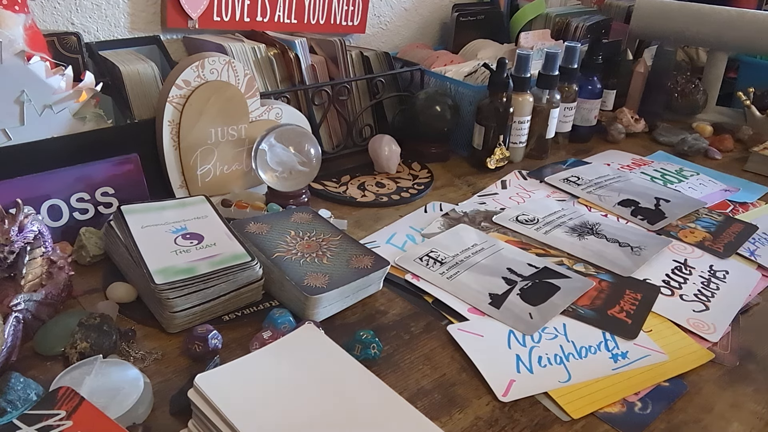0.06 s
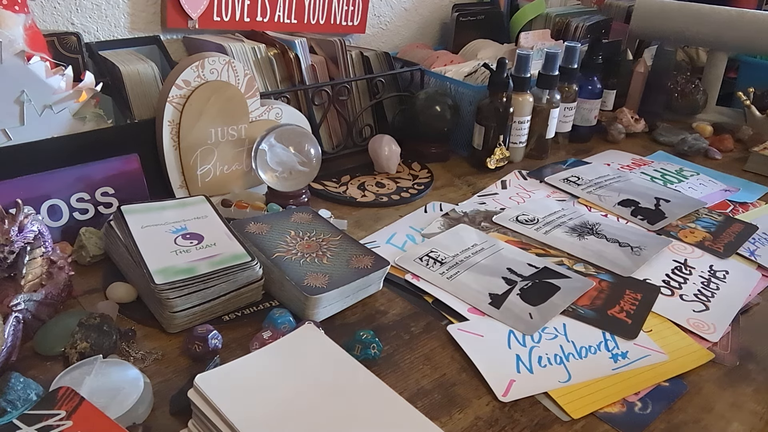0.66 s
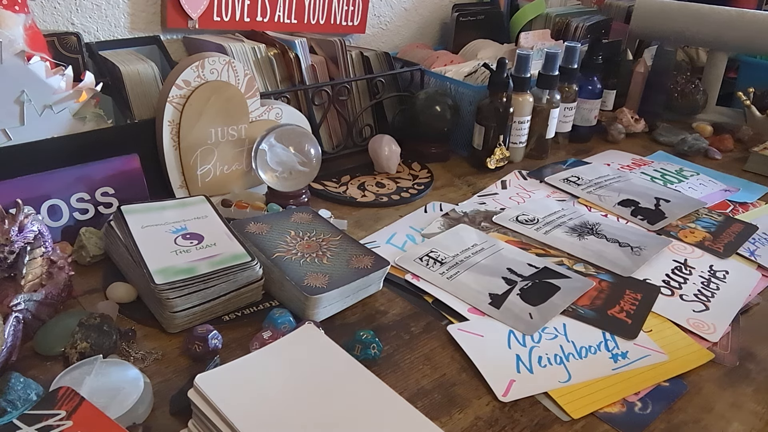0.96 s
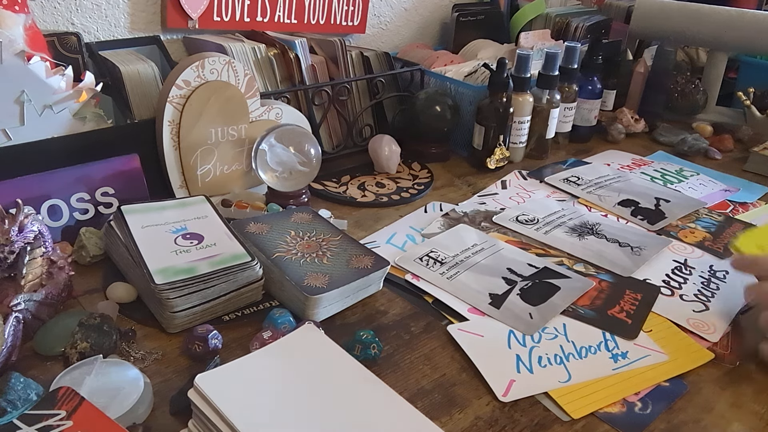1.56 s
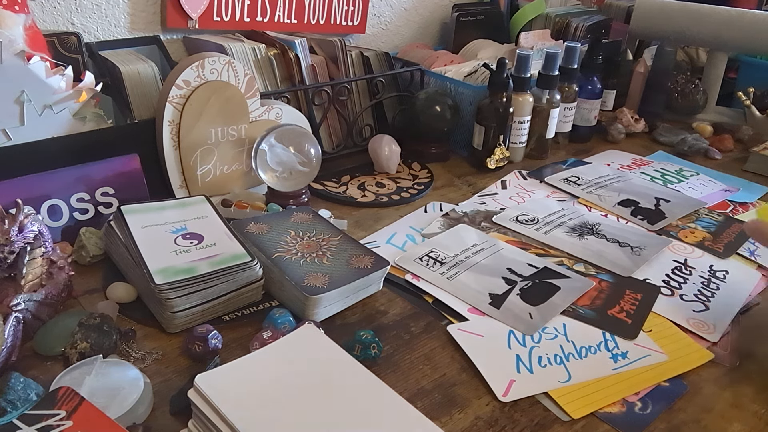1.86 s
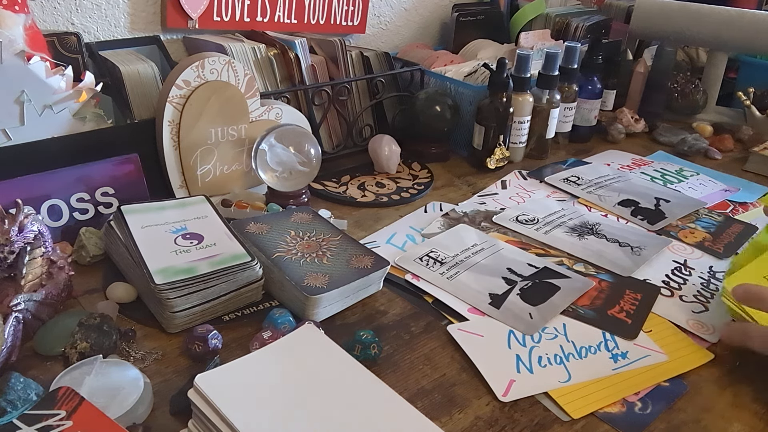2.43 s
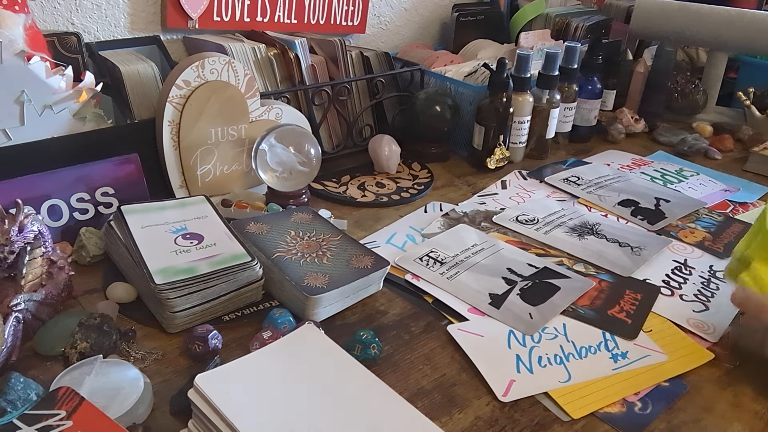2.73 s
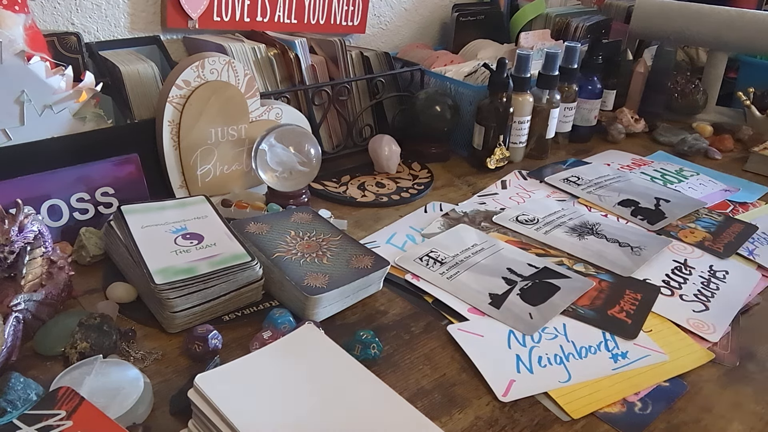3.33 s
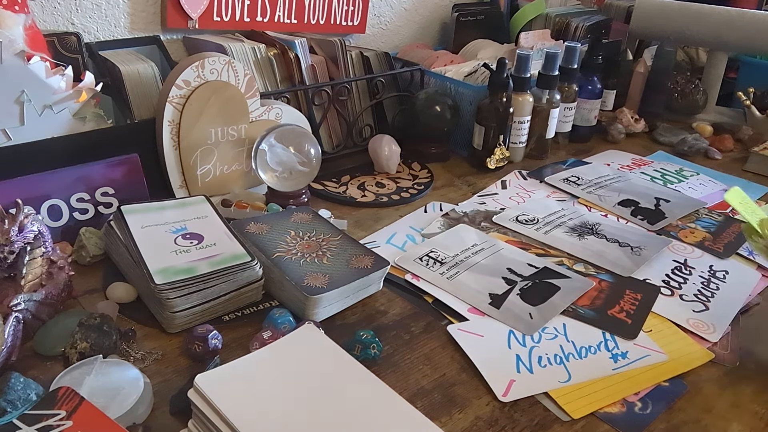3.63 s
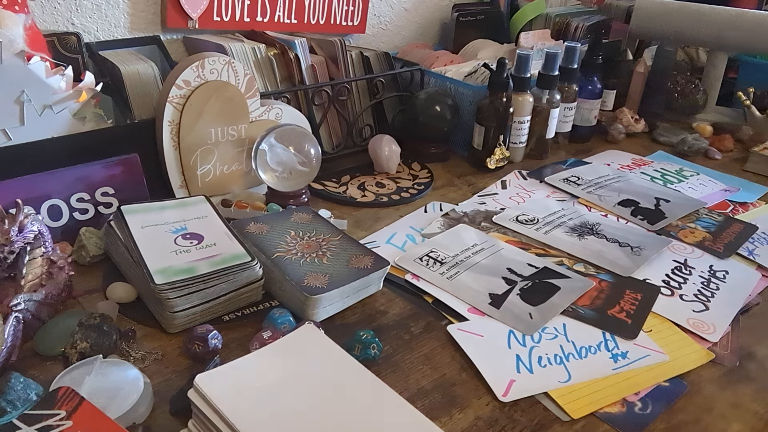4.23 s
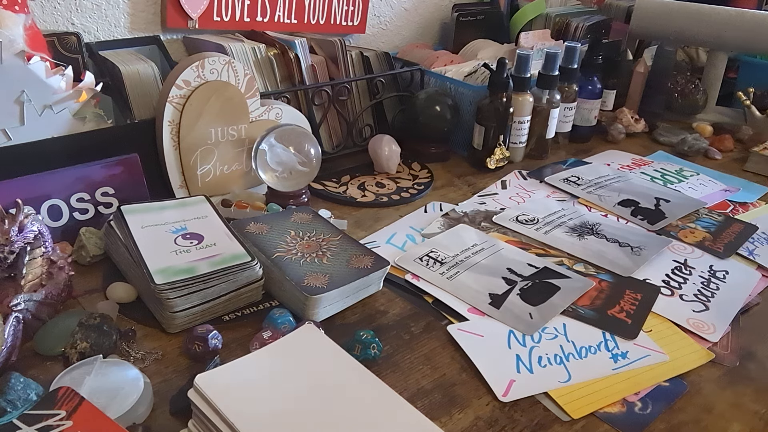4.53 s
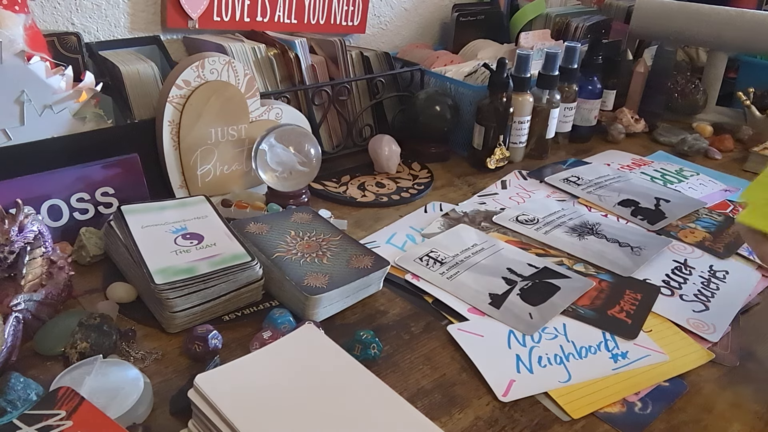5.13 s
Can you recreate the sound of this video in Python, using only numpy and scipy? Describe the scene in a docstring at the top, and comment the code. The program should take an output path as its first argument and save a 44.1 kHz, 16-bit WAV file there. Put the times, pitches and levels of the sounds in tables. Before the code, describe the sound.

Paper cards are handled close to the microphone in a small, quiet room. They slide over each other with soft hisses and rubs, their edges clicking, and small packets flop together. The deck is then knocked twice on a wooden table, two thuds with a brief clatter, much louder than the rest. A few faint slides and ticks follow over a low room rumble.

```python
"""Paper cards slide, tick and flop together close by, then the deck is knocked twice on a wooden table.
Card faces hiss and edges rub with the speed of each stroke; edges snap off each other and ring the card.
Small packets meet on a cushion of air. Each squaring knock is a thud, a clatter and the table's ring.
Underneath: hands shifting on the table and the low rumble of a small, quiet room."""
import sys
import numpy as np
from scipy import signal
from scipy.fft import rfft, irfft
from scipy.io import wavfile

SR = 44100
rng = np.random.default_rng(int(sys.argv[2]) if len(sys.argv) > 2 else 0)


def to_wav(sig):
    """Store sig (one row per channel, or 1-D mono) as 16-bit WAV at the path in sys.argv[1].

    Samples outside -1..1 are clipped; the rate is SR.
    """
    pcm = np.clip(np.atleast_2d(sig), -1, 1) * 32767
    pcm = np.round(pcm).astype(np.int16)
    wavfile.write(sys.argv[1], SR, pcm.T)  # frames by channels


N = 228737
T = np.arange(N) / SR
DECK_LATE_MS = -.19  # left-channel lag at the deck's usual position


def undb(db):
    """Decibels to gain."""
    return 10 ** (np.asarray(db) / 20)


def unit(x):
    """Scale to rms 1."""
    return x / np.sqrt(np.mean(x ** 2))


def add(track, start_s, sound):
    """Mix a sound into a track."""
    i = max(int(start_s * SR), 0)
    part = sound[..., :max(N - i, 0)]
    track[..., i:i + part.shape[-1]] += part


def colour(x, points):
    """Minimum-phase filter through (f/Hz, level/dB) points; keeps the power of white noise."""
    n = 2 * x.shape[-1]
    hz, db = np.transpose(points)
    log_hz = np.log(np.fft.rfftfreq(n, 1 / SR) + 1)
    gain = unit(undb(np.interp(log_hz, np.log(hz), db)))
    cepstrum = irfft(np.log(gain)) * (1 + np.sign(np.fft.fftfreq(n)))
    return irfft(rfft(x, n) * np.exp(rfft(cepstrum)))[..., :n // 2]


def resonance(x, hz, width_hz):
    """Resonator, gain 1 at its centre."""
    return signal.lfilter(*signal.iirpeak(hz, hz / min(width_hz, SR / 4), fs=SR), x)


def double_resonance(x, hz, width_hz):
    """Two equal resonators in series."""
    return resonance(resonance(x, hz, width_hz), hz, width_hz)


def lowpass(x, hz, order=2):
    """Maximally flat low-pass."""
    return signal.sosfilt(signal.butter(order, hz, fs=SR, output="sos"), x)


def highpass(x, hz):
    """First-order high-pass."""
    return signal.sosfilt(signal.butter(1, hz, "high", fs=SR, output="sos"), x)


def walk(rate_hz):
    """Random wander, spread near 1."""
    knots = rng.standard_normal(int(N / SR * rate_hz) + 2)
    return np.interp(T * rate_hz, np.arange(len(knots)), knots)


def grains(per_s, spread_db, size=N):
    """Tiny contacts at random times, most weak, a few strong."""
    strength = undb(spread_db * np.minimum(rng.exponential(size=size), 4))
    return unit((rng.random(size) < per_s / SR) * rng.choice([-1, 1], size) * strength)


def ears(x, late_ms):
    """Mono to stereo; the left lags by late_ms (negative: leads)."""
    lag = int(round(late_ms * SR / 1000))
    return np.array([np.pad(x, (max(k, 0), 0))[:len(x)] for k in (lag, -lag)])


def crackle(per_s, spread_db, shared_hz, late_ms=-0.13, size=N):
    """Contacts spread over a card: both sides share the lows, the highs are independent."""
    common, left, right = (grains(per_s, spread_db, size) for _ in range(3))
    lows = ears(lowpass(common, shared_hz, order=1), late_ms)
    return lows + highpass(np.array([left, right]), shared_hz)


def room(x, early_db, tail_db, t60_s=0.17, early_s=0.0062, shared_hz=600):
    """Add early scatter from things on the table and a short wall tail, near mono in the bass."""
    t = T[:SR // 2]
    early = np.exp(-t / early_s) * (t > .002) * rng.standard_normal((2, len(t)))
    tail = undb(-60 * t / t60_s) * np.clip(t / 0.014 - .5, 0, 1) * rng.standard_normal((2, len(t)))
    mid, side = (undb(early_db) * unit(early) + undb(tail_db) * unit(tail)) / np.sqrt(2 * len(t))
    side = highpass(side, shared_hz)
    spectrum = [(150, 1.5), (500, 2), (3500, -1.5), (7000, -1.5), (16000, -0.5)]  # f/Hz, level/dB
    response = colour(np.array([mid + side, mid - side]), spectrum)
    return x + signal.fftconvolve(x, response, axes=1)[:, :N]


def room_tone():
    """Wavering low rumble common to both sides, under a faint wide hiss and a thin whine."""
    # still-room spectrum: f/Hz, level/dB
    spectrum = [(20, -30.5), (45, -13), (65, 2), (95, 0.5), (130, -10), (190, -16), (300, -24),
                (600, -36.5), (1400, -31.5), (3000, -40.5), (6000, -49), (16000, -56)]
    mid, side = colour(rng.standard_normal((2, N)), spectrum)
    side = highpass(side, 700) + undb(-14.5) * side
    rumble = undb(-66.5) * unit(double_resonance(rng.standard_normal(N), hz=68, width_hz=30))
    whine = undb(-87) * unit(double_resonance(rng.standard_normal(N), hz=970, width_hz=60))
    air = undb(-64 + 0.83 * walk(4.6)) * np.array([mid + side, mid - side])
    return (air + rumble + whine) * undb([[-.5], [.5]])


def speed(peak_s, rise_s, fall_s):
    """Speed of a hand movement: smoothly from rest to 1 and back."""
    phase = np.interp(T, [peak_s - rise_s, peak_s, peak_s + fall_s], [0, 1, 0])
    return np.sin(np.pi / 2 * phase) ** 1.92


def effort(resting_db=-70):
    """Hand activity as a gain: shifts add in power; the hands are never quite still."""
    # hand and arm shifts: peak t/s, rise/s, fall/s, level/dB
    shifts = [(.2, .6, 0.93, -60.5), (2.35, 0.92, 1.3, -63), (2.92, 0.15, 0.13, -57), (3.3, 0.45, 0.3, -53),
              (4.05, .9, 1.3, -52)]
    power = sum((undb(db) * speed(peak_s, rise_s, fall_s)) ** 2 for peak_s, rise_s, fall_s, db in shifts)
    return np.sqrt(undb(resting_db) ** 2 + power)


def hands(lumpy_db=2.5):
    """Hands and forearms shift on the table: a soft, lumpy rumble."""
    # bump spectrum: f/Hz, level/dB
    spectrum = [(30, -17.5), (80, 7), (150, -2.5), (250, -9.5), (450, -17), (900, -23.5), (3000, -50.5),
                (15000, -61)]
    bumps = colour(grains(per_s=790, spread_db=0.86), spectrum)
    return ears(bumps * effort() * undb(lumpy_db * walk(23)), late_ms=-.2)


def friction(held_hiss_db=-36, held_rub_db=-17):
    """Hiss and rub gains: both follow stroke speed, over the faint chafing of the held cards."""
    # card drawn over card: peak t/s, rise/s, fall/s, face hiss/dB, edge rub/dB
    strokes = [(.045, 0.053, 0.066, -71, -71), (.29, .13, 0.18, -82, -82), (.78, 0.052, 0.026, -79, -79),
               (.84, 0.037, 0.066, -86, -73.5), (1.0, 0.064, 0.05, -81.5, -78.5),
               (1.457, 0.11, 0.058, -62, -75), (1.514, 0.046, 0.026, -59, -67.5),
               (1.58, 0.033, 0.03, -64, -58.5), (1.65, 0.047, 0.033, -66, -64.5),
               (1.71, 0.07, 0.068, -76.5, -72.5), (2.0, 0.056, .13, -77.5, -64.5),
               (2.1, 0.026, 0.049, -70, -64.5), (2.175, 0.071, 0.05, -71, -62.5),
               (2.255, .02, 0.0098, -63.5, -65), (2.344, 0.096, .19, -62, -57),
               (2.534, 0.11, 0.17, -60.5, -59.5), (2.75, 0.096, 0.18, -63.5, -73),
               (2.85, 0.073, .09, -65.5, -67), (2.97, 0.066, 0.058, -70.5, -75),
               (3.05, 0.1, 0.057, -58.5, -74.5), (3.19, .11, 0.06, -57.5, -48.5),
               (3.315, 0.12, 0.043, -63.5, -72), (3.53, 0.13, 0.048, -65.5, -62),
               (3.604, 0.063, 0.046, -65, -76), (3.725, 0.024, 0.027, -79.5, -66),
               (4.2, 0.15, 0.24, -82, -66.5), (4.294, 0.031, 0.037, -56.5, -64),
               (4.345, 0.041, 0.033, -72, -89), (4.575, 0.056, 0.039, -73.5, -92),
               (4.683, 0.065, 0.064, -83.5, -94), (4.956, .16, 0.11, -68, -71),
               (5.174, 0.029, 0.074, -58, -62)]
    power = (undb([[held_hiss_db], [held_rub_db]]) * effort()) ** 2
    for peak_s, rise_s, fall_s, hiss_db, rub_db in strokes:
        power += (undb([[hiss_db], [rub_db]]) * speed(peak_s, rise_s, fall_s)) ** 2
    return np.sqrt(power)


def sliding(hiss_catch_db=2.76, rub_catch_db=3.5, snag_db=-8):
    """Faces hiss, nicks crackle, edges rub and snag; the bending card's resonances come and go."""
    # face and edge friction spectra: f/Hz, level/dB
    hiss_spectrum = [(300, -21), (900, -4.5), (2000, 0), (3500, 2), (5000, 0.5), (8000, -2), (11500, 1.5),
                     (15000, -1.5), (17000, -4.5)]
    rub_spectrum = [(100, -9.5), (250, -2), (450, -2.5), (750, -4), (1400, -4), (2200, -7), (3500, -18.5),
                    (6000, -36), (15000, -36.5)]
    flex_modes = [(2500, -17), (3650, -3), (4400, -12.5)]  # f/Hz, level/dB
    face_gain, edge_gain = friction()
    catch = walk(rate_hz=63)  # cards grip and let go
    nicks = crackle(per_s=150, spread_db=4.9, shared_hz=6000, late_ms=-0.32)
    face_grain = crackle(per_s=9000, spread_db=1.9, shared_hz=1800, late_ms=-.24)
    scrape = colour(face_grain + undb(-4.5) * nicks, hiss_spectrum)
    flex = sum(double_resonance(scrape, hz, 960) * undb(db + 5.8 * walk(25)) for hz, db in flex_modes)
    hiss = (scrape + flex) * face_gain * undb(hiss_catch_db * catch)
    edge_grain = crackle(per_s=1300, spread_db=2.4, shared_hz=2500, late_ms=-0.22)
    rub = colour(edge_grain, rub_spectrum) * edge_gain * undb(rub_catch_db * catch)
    snag_pulses = ears(grains(per_s=40, spread_db=3.8), DECK_LATE_MS)
    snags = resonance(snag_pulses, hz=3900, width_hz=1400) * edge_gain * undb(snag_db)
    return room(hiss + rub + snags, early_db=-4, tail_db=-13.5)


def ticks(cut_s=(3.1, 3.5), cut_late_ms=.3):
    """An edge snaps off its neighbour and rings the card; the stiffer the edge, the more dry click."""
    # edge snaps: t/s, level/dB, ring f/Hz, decay/ms
    snaps = [(.272, -42.5, 860, 1.5), (.333, -51.5, 870, 2.5), (.774, -65, 5500, 13),
             (1.222, -56, 2000, 4.6), (1.493, -48, 2610, 9), (1.836, -51, 1320, 3.2),
             (2.023, -37.5, 680, 3.9), (2.062, -52, 3370, 2.7), (2.093, -53, 2950, 3),
             (2.12, -42.5, 3400, 2), (2.148, -32.5, 1200, 2.9), (2.346, -22, 890, 1.6),
             (2.436, -38.5, 1010, 2.4), (2.482, -43, 1380, 3.9), (2.543, -31.5, 716, 1.9),
             (2.852, -42, 2010, 5.5), (3.124, -30.5, 3400, 6.6), (3.175, -28, 1100, 4.3),
             (3.189, -22, 1800, 1.8), (3.432, -44, 3900, 6), (3.468, -30, 2690, 5.1),
             (3.585, -41.5, 1900, 1.3), (3.723, -50, 2990, 1.7), (4.282, -47.5, 3700, 4.9),
             (4.343, -55, 6940, 1.7), (4.965, -46, 1800, 5.4), (5.171, -37.5, 1500, 1.3)]
    out, t = np.zeros((2, N)), T[:SR // 10]
    for start_s, db, hz, decay_ms in snaps:
        # the deck is cut on the other side
        late_ms = cut_late_ms if cut_s[0] < start_s < cut_s[1] else DECK_LATE_MS
        grit = crackle(per_s=14000, spread_db=1.2, shared_hz=3000, late_ms=late_ms, size=len(t))
        click = ears(1. * (t == 0), late_ms)
        slip = undb(-1.5) * grit * np.exp(-1000 * t / decay_ms) + undb(9.5) * click
        ring = double_resonance(slip, hz, 1.32 * hz) * np.sqrt(5000 / hz)
        add(out, start_s, undb(db) * (ring + undb(-12.5) * hz / 3000 * slip))
    return room(out, early_db=-5.5, tail_db=-10.5)


def flops():
    """Many cards meet within tens of ms; the air between them softens the blow."""
    # packets meeting: first touch t/s, level/dB, rise/ms, decay/ms, cutoff/Hz
    packets = [(0.017, -44.5, 13, 8.9, 148), (1.634, -57, 15.5, 22, 1620), (2.319, -49, 19.6, 29, 1560),
               (2.532, -46.5, 13.4, 5.9, 1330), (3.125, -36, 14.6, 26, 480), (3.171, -22, 19.9, 1.5, 2500),
               (3.429, -34, 18.5, 18.6, 760), (3.486, -41.5, 7.9, 7.2, 1800), (3.54, -48, 12, 14.6, 830)]
    # packet spectrum: f/Hz, level/dB
    spectrum = [(40, -14), (90, 3.5), (150, 2), (250, -8), (340, -6.5), (500, -1.5), (700, -2), (1200, -3),
                (2500, -0.5), (5000, -16.5), (15000, -5)]
    out = np.zeros((2, N))
    patter = colour(crackle(per_s=4000, spread_db=2.27, shared_hz=1540), spectrum)
    for start_s, db, rise_ms, decay_ms, cutoff_hz in packets:
        age_ms = 1000 * (T - start_s)
        swell = np.clip(age_ms / rise_ms, 0, 1) * np.exp(-np.maximum(age_ms - rise_ms, 0) / decay_ms)
        out += undb(db) * swell * unit(lowpass(patter, cutoff_hz, order=3) + undb(-37) * patter)
    return room(out, early_db=-3.5, tail_db=-11)


def knocks(max_t60_s=.18):
    """The deck's edge thuds on the wood, loose cards clatter and the table rings."""
    # deck on table: t/s, thud level/dB, f/Hz, width/Hz, contact/ms, clatter/dB, ring/dB
    blows = [(3.8246, -5, 588, 612, .6, -14.5, -25), (4.0034, -1, 426.6, 554.6, .7, -12, -22)]
    # table-top modes, low and high: f/Hz, level/dB, t60/s before the cap
    modes = [(128, -14, 0.099), (158, -3, 0.12), (305, -10.5, 0.17), (355, -8, 0.21), (442.4, -3, 0.15),
             (554, -6, .17), (677, -16.5, 0.13), (774, -19, 0.11), (1147, -15.5, 0.16), (1326, -13, 0.11),
             (1540, -12, 0.085), (1870, -20, 0.17), (2055, -16, 0.17), (2640, -12.5, 0.08),
             (3150, -17, .08), (3400, -16.5, .08)]
    # loose-card spectrum: f/Hz, level/dB
    clatter_spectrum = [(200, -12.5), (800, -8.5), (1100, -2), (1500, 7.5), (2200, -2), (3300, 4.5),
                        (4500, -12.5), (6000, -17), (8000, -29), (11500, -20.5), (16000, -26)]
    thuds, rings, clatter = np.zeros(N), np.zeros(N), np.zeros((2, N))
    t = T[:SR // 2]
    ring = sum(undb(db - 60 * t / min(t60_s, max_t60_s)) * np.sin(2 * np.pi * hz * t)
               for hz, db, t60_s in modes)
    settle = (1 - np.exp(-t / 0.0018)) * np.exp(-t / 0.0046)
    for start_s, db, hz, width_hz, contact_ms, clatter_db, ring_db in blows:
        force = np.sin(np.pi * np.minimum(1000 * t / contact_ms, 1)) ** 2
        cushioned = lowpass(force, 1.7 * hz)  # softened by the wood
        thud = -double_resonance(cushioned, hz, width_hz)
        add(thuds, start_s, undb(db) * thud / abs(thud).max())
        add(rings, start_s + 0.0018, undb(ring_db) * ring * (1 - np.exp(-t / 0.0013)))
        # protruding cards touch first, the rest settle after the blow
        first, rest = (crackle(per_s=9000, spread_db=2.2, shared_hz=2500, size=len(t)) for _ in range(2))
        add(clatter, start_s - .001, undb(-26.5) * first * np.exp(-t / 0.0015))
        add(clatter, start_s + .001, undb(clatter_db) * colour(rest * settle, clatter_spectrum))
    wood = room(ears(thuds, -0.23), early_db=-12.5, tail_db=-15.5, shared_hz=288) + ears(rings, -0.16)
    return wood + room(clatter, early_db=-7, tail_db=-11.5)


def scene():
    """Handled cards in their room, stereo."""
    return sliding() + ticks() + flops() + knocks() + hands() + room_tone()


def record(dry, bottom_hz=30, top_hz=15900):
    """Thin the deepest bass, clip at full scale, cut the top."""
    clipped = np.clip(highpass(dry, bottom_hz), -1, 1)
    return signal.sosfilt(signal.ellip(8, .2, 70, top_hz, fs=SR, output="sos"), clipped)


dry = scene()
out = record(dry)
to_wav(out)
```